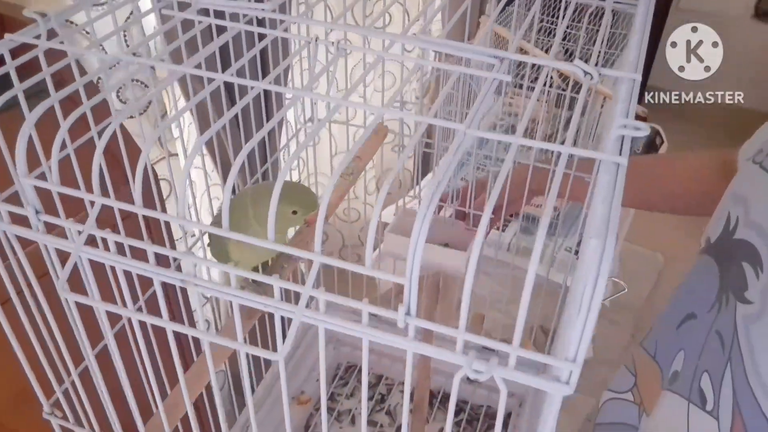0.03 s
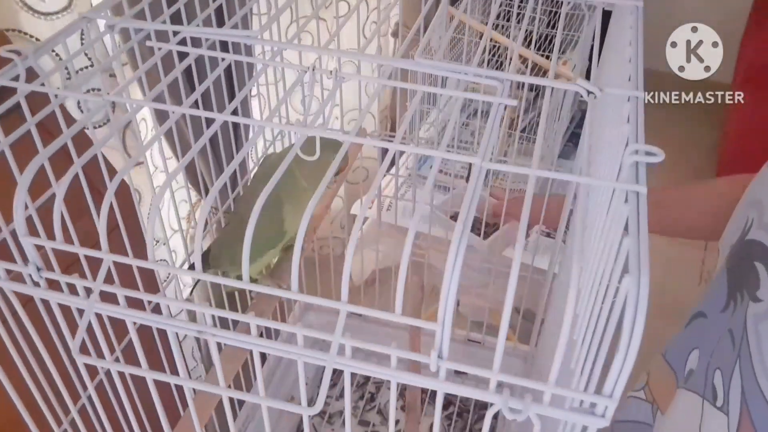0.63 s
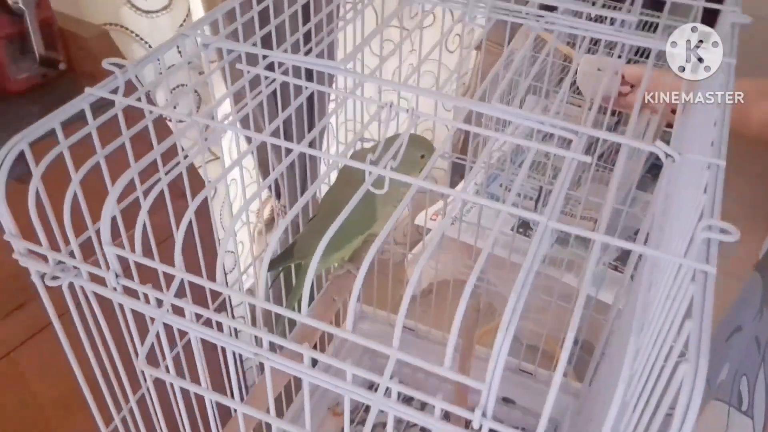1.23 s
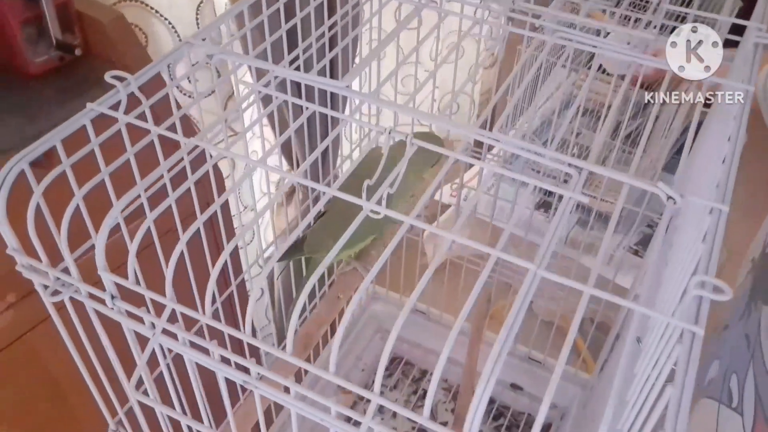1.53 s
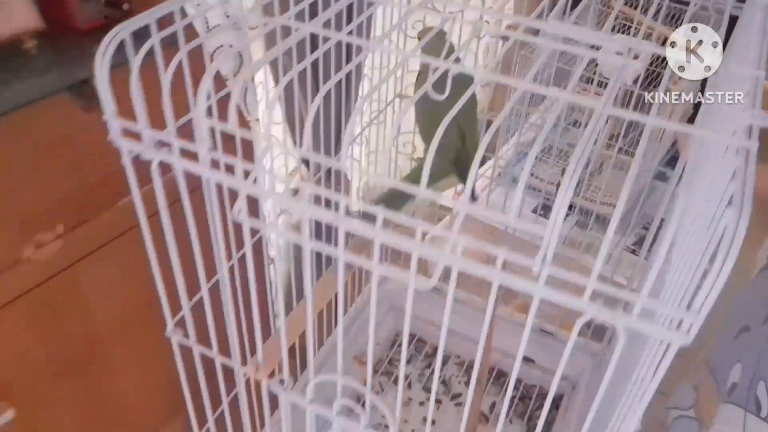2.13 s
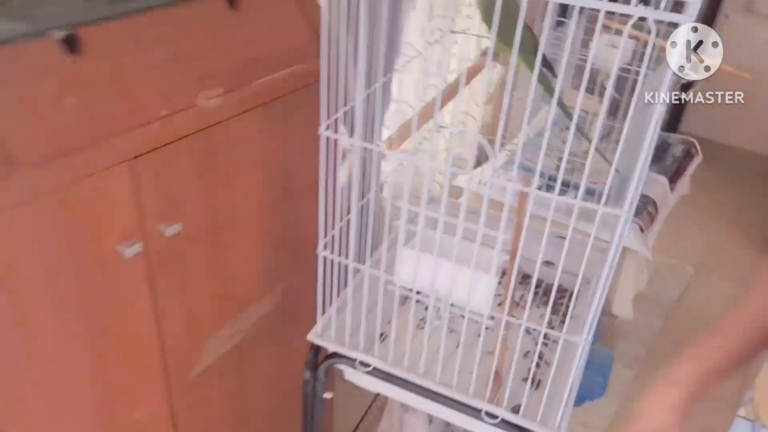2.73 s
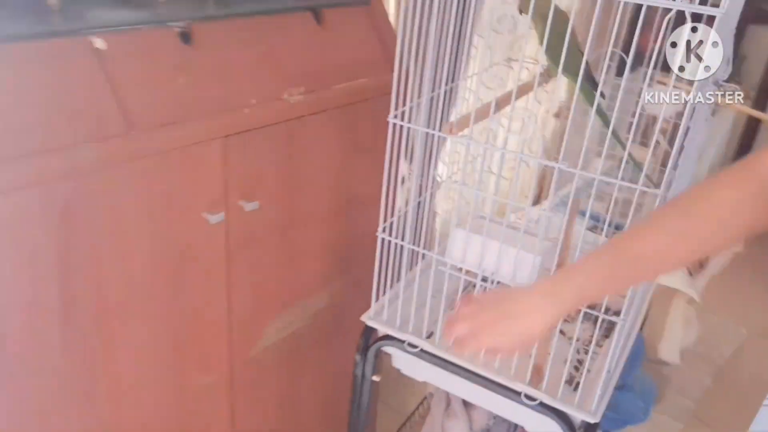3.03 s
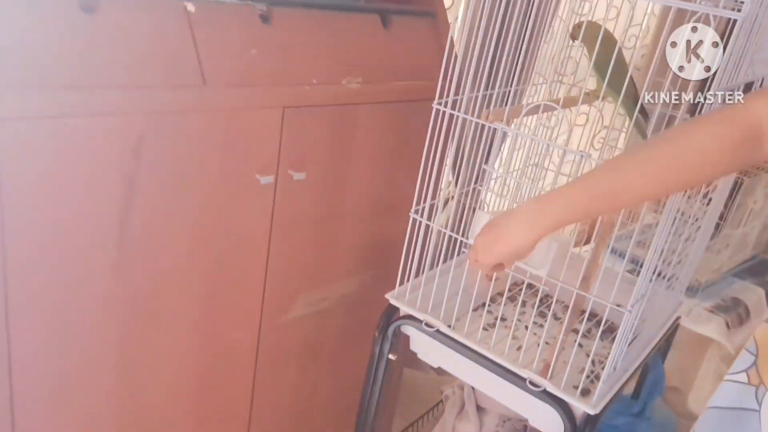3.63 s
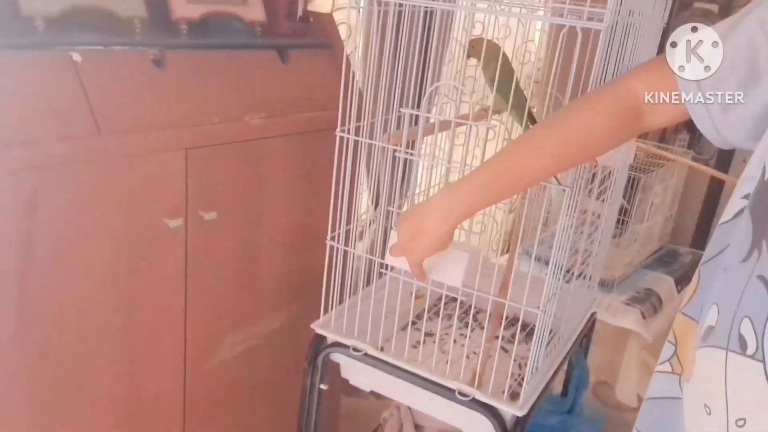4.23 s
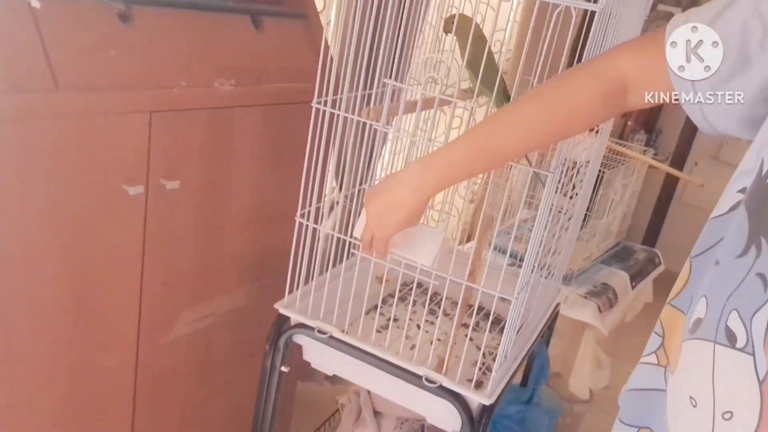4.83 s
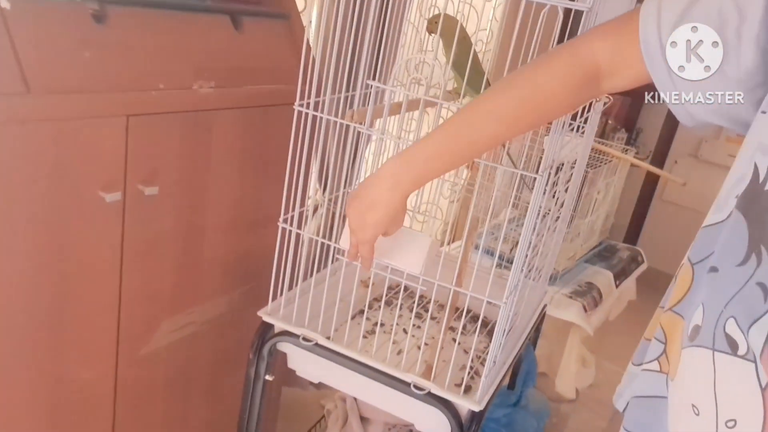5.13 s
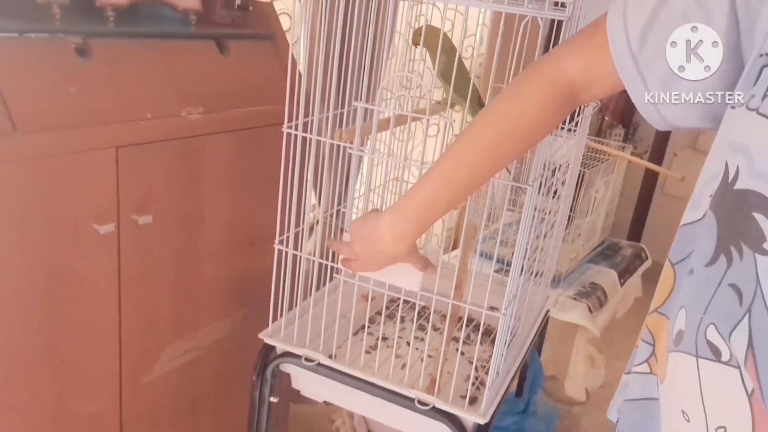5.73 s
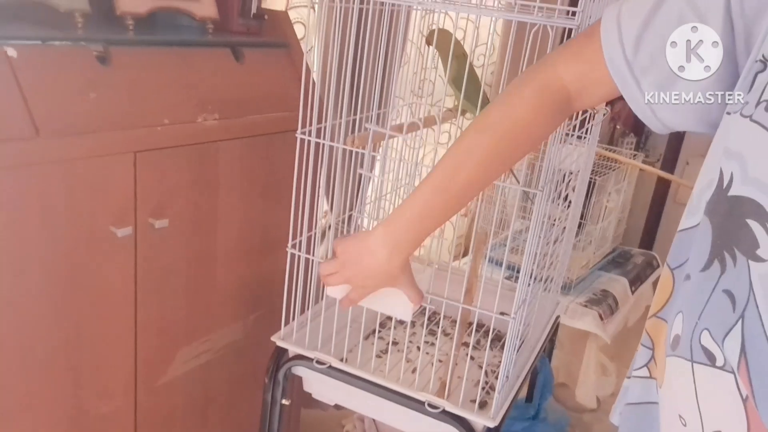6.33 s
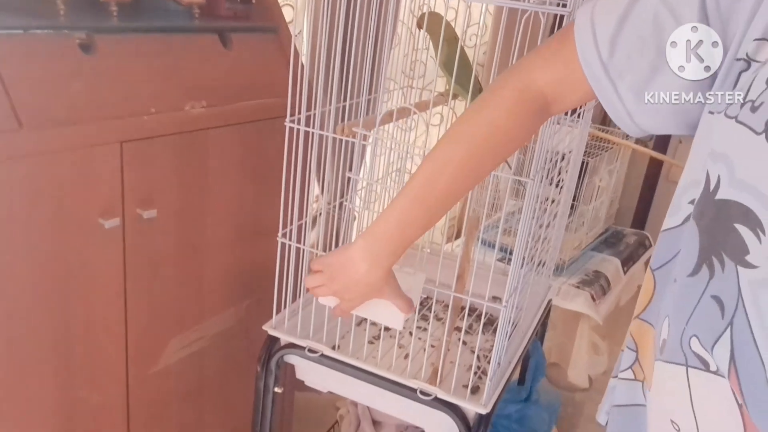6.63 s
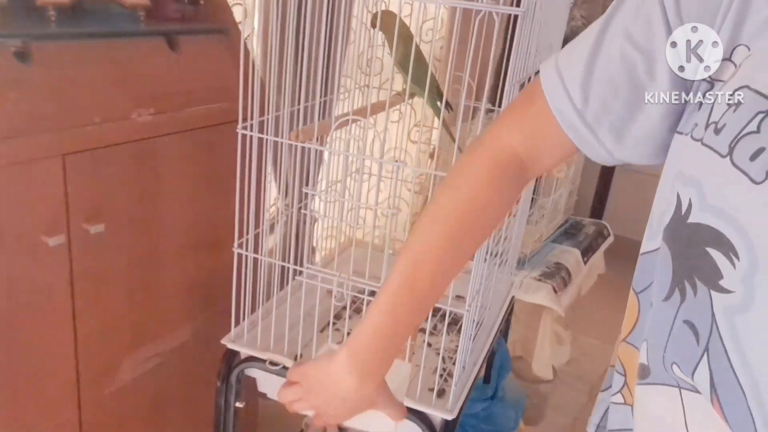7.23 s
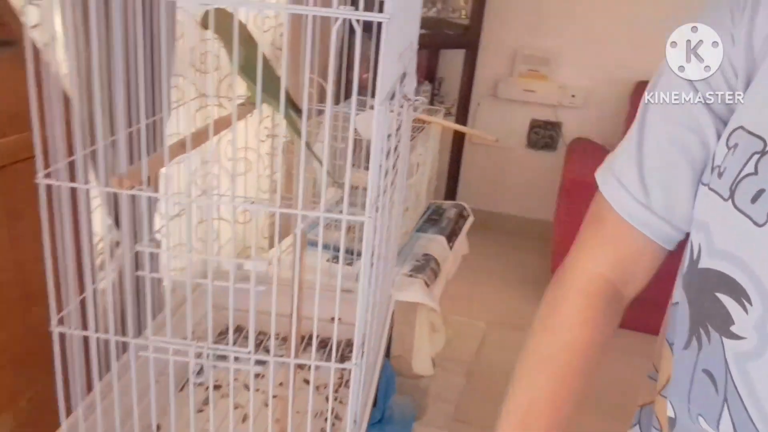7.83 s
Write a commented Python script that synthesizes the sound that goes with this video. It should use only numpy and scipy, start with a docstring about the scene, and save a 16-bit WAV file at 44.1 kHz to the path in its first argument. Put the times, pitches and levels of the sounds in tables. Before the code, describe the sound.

A wire birdcage rattles and clangs in an echoing room as a plastic feeder is worked loose, with one hoarse parakeet squawk.

```python
"""A wire birdcage is handled in a hard, echoing room, over a low rumble. Its side wires rattle and its
frame clangs, each knock a swarm of tiny contacts that sets the metal ringing; a faint tone lingers.
From about 3 s a plastic feeder is worked loose, knocking amid more clangs of the frame. Near 5.7 s a
parakeet gives one hoarse, rising squawk, then the small front door clacks shut. After a few more knocks
a small bird chirps twice with both sides of its syrinx, and the feeder gives a last soft tap."""
import sys
import numpy as np
from scipy import signal
from scipy.fft import rfft, irfft
from scipy.io import wavfile
from scipy.ndimage import uniform_filter1d

SR = 44100
rng = np.random.default_rng(int(sys.argv[2]) if len(sys.argv) > 2 else 0)


def pcm_store(signal):
    """Save signal as 16-bit PCM."""
    levels = np.round(np.clip(np.atleast_2d(signal), -1, 1) * 32767)
    wavfile.write(sys.argv[1], SR, levels.astype(np.int16).T)


N = 356680
SIZE = 49152  # samples in one knock with its tail
T = np.arange(SIZE) / SR
HZ = np.fft.rfftfreq(SIZE, 1 / SR)


def amp(db):
    """Decibels to gain."""
    return 10 ** (np.asarray(db) / 20)


def unit_rms(x):
    """Scaled to rms 1."""
    return x / np.sqrt(np.mean(x ** 2) + 1e-20)


def unit_energy(x):
    """Scaled to energy 1 in each channel."""
    return x / np.sqrt(np.sum(x ** 2, axis=-1, keepdims=True) + 1e-20)


def curve(points, hz):
    """Breakpoints (frequency, value) joined on a log-frequency axis."""
    freqs, values = np.transpose(points)
    return np.interp(np.log(hz + 1), np.log(freqs), values)


def decay(t, t60):
    """Falls 60 dB in t60 seconds."""
    return np.exp(-np.log(1000) * t / np.maximum(t60, 1e-3))


def add(mix, s, sound):
    """Mixes a sound in at s seconds."""
    part = mix[..., max(round(s * SR), 0):][..., :sound.shape[-1]]
    part += sound[..., :part.shape[-1]]


def min_phase(db):
    """Minimum-phase frequency response for a dB curve over HZ."""
    log_gain = np.log(amp(np.r_[db, db[-2:0:-1]]))
    return np.exp(np.conj(signal.hilbert(log_gain)))[:len(db)]


def wobble(count, size):
    """A random line of rms 1, smoothed over size points."""
    return unit_rms(uniform_filter1d(uniform_filter1d(rng.standard_normal(count), size), size))


def trembling_phase(hz, jitter, size=24):
    """Phase of a tone whose pitch trembles at random."""
    return 2 * np.pi * np.cumsum(hz * (1 + jitter * wobble(len(hz), size))) / SR


def mic_pair(spectra, hz):
    """Two unrelated spectra become a microphone pair, alike in the bass."""
    # Stereo image of the room: (frequency [Hz], left-right likeness [0-1])
    likeness = [(100, 1), (380, 0.87), (650, 0.39), (1100, 0.046), (3000, 0.056), (12000, 0.016)]
    same = np.clip(curve(likeness, hz), 0, 1)
    return np.array([same * spectra[1] + np.sqrt(1 - same ** 2) * spectra[0], spectra[1]])


def room(build_s=0.0052, echoes_per_s=5000):
    """Frequency response of the room from one spot: dense echoes, each band dying at its own speed."""
    # Reverb tail: (frequency [Hz], t60 [s])
    reverb_times = [(120, 1.23), (400, 1.16), (1000, 0.93), (2800, 0.58), (7000, 0.53), (15000, 0.36)]
    echoes = rng.standard_normal((2, SIZE)) * (rng.random((2, SIZE)) < echoes_per_s / SR)
    echoes *= 1 - np.exp(-T / build_s)
    hz, t, bands = signal.stft(echoes, SR, nperseg=256)
    t60 = curve(reverb_times, hz)[:, None]
    bands = mic_pair(bands, hz[:, None]) * decay(t, t60) / np.sqrt(t60)
    return rfft(unit_energy(signal.istft(bands, SR, nperseg=256)[1][:, :SIZE]))


def reverb(sound):
    """The room's stereo answer to a sound."""
    return signal.fftconvolve(np.atleast_2d(sound), irfft(room()), axes=1)[:, :N]


def rumble(level_db=-51.5, hiss_from_hz=3100):
    """Room noise with a few low resonances standing out; its hiss lifts, then slowly sinks."""
    # Room tone: (frequency [Hz], relative level [dB])
    tone_colour = [(20, -29), (32, -15), (48, 3.5), (76, -30), (110, -12.5), (200, -7.5), (320, -14),
                   (450, -9), (700, -16), (1200, -19), (2000, -22.5), (3200, -30), (8000, -30.5),
                   (15000, -36)]
    # Level of the treble hiss over time: (time [s], gain [dB])
    hiss_course = [(1.2, -7), (3.2, -3), (5.3, -9), (8, -9)]
    # Low room resonances: (centre [Hz], half-width [Hz], level [dB])
    resonances = [(48.6, 15, -60.5), (101.6, 14, -58), (153, 9.4, -69), (209.8, 2.9, -67)]
    hz = np.fft.rfftfreq(N, 1 / SR)
    noise = mic_pair(rfft(rng.standard_normal((2, N))), hz)
    wash = amp(level_db) * unit_rms(irfft(noise * amp(curve(tone_colour, hz)), N))
    hiss = wash - irfft(rfft(wash) / (1 + (hz / hiss_from_hz) ** 4), N)
    hiss_gain = amp(np.interp(np.arange(N) / SR, *np.transpose(hiss_course)))
    drones = sum(amp(db) * unit_rms(irfft(noise / (1 + ((hz - centre) / width) ** 4), N))
                 for centre, width, db in resonances)
    return wash + (hiss_gain - 1) * hiss + drones


def contacts(snap_db, chatter_s, per_s, spread_db=4):
    """A first snap, snap_db over the swarm of small contacts that follows as loose parts bounce."""
    age = T / max(chatter_s, 1e-3)
    hits = (rng.random(SIZE) < per_s / SR) * rng.choice([-1, 1], SIZE)
    sizes = amp(spread_db * rng.uniform(-1.64, 2.8, SIZE))
    drive = unit_energy(hits * sizes * age * np.exp(-age))
    drive[0] += amp(snap_db)
    return unit_energy(drive)


def contact_colour(thud_db, tilt_db, clean, pivot_hz=980, thud_octaves=1.7):
    """Spectrum of one knock in dB: heavy contacts thud, hard ones are bright, clean snaps crack."""
    # EQ of a clean single snap: (frequency [Hz], gain [dB])
    crack = [(135, -22.5), (380, -3.5), (1100, -7), (2300, 5.5), (4800, -3.5), (11500, -2.5)]
    octaves = np.log2((HZ + 1) / pivot_hz)
    bass_db = thud_db * np.clip(-octaves / thud_octaves, 0, 1)
    treble_db = tilt_db * np.maximum(octaves, 0)
    return bass_db + treble_db + clean * curve(crack, HZ)


def ringing(modes, drift=0.0093):
    """Spectrum of a part's own tones, wavering as the hand's load shifts."""
    bent_time = np.cumsum(1 + drift * wobble(SIZE, size=500)) / SR
    tones = 0
    for hz, db, t60 in modes:
        turns = rng.random() + rng.random((2, 1)) * min(hz / 2000, 1)  # long waves reach both mics in step
        tones += amp(db) * decay(T, t60) * np.sin(2 * np.pi * (hz * bent_time + turns))
    return rfft(tones)


def retuned(spectrum, slack=0.0086):
    """Each knock finds the wires under a slightly different tension."""
    tuning = 1 + slack * rng.standard_normal()
    return np.array([np.interp(HZ / tuning, HZ, channel) for channel in spectrum])


def knocks(hits, modes, part_eq, per_s, tick_db, clack_db, clack_t60, ring_db, room_db,
           ripple_db, near_db):
    """Contacts excite one part of the cage: a tick, a short clack of crowded modes, a ring, the room."""
    # EQ of the whole cage: (frequency [Hz], gain [dB])
    cage_eq = [(40, -8), (85, -7.5), (125, 3), (175, -5), (300, 2), (680, -6), (1200, -2.5), (1750, -3),
               (2300, 0), (5500, -1), (7500, -1.5), (10000, -3.5), (14000, -1)]
    body_db = curve(cage_eq, HZ) + curve(part_eq, HZ)
    spots = []
    for _ in range(3):
        # each place of contact favours some high resonances and misses others
        peaks_db = ripple_db * np.minimum(wobble(len(HZ), size=130), 1) * HZ / (HZ + 1800)
        burst = unit_energy(rng.standard_normal((2, SIZE)) * decay(T, clack_t60))
        clack = mic_pair(rfft(burst), HZ)
        direct = (amp(tick_db) + amp(clack_db) * clack) * min_phase(peaks_db)
        echoes = amp(room_db) * room() * min_phase(0.31 * peaks_db)  # the room evens out the peaks
        spots.append((direct, amp(ring_db) * ringing(modes), echoes))
    out = np.zeros((2, N))
    for k, (s, strength_db, thud_db, tilt_db, chatter_s, snap_db, hit_ring_db) in enumerate(hits):
        direct, ring, echoes = spots[k % len(spots)]
        clean = np.clip(snap_db / 11, 0, 1)  # 11 dB over the chatter is a clean single snap
        blow_db = strength_db + body_db + contact_colour(thud_db, tilt_db, clean)
        blow = rfft(contacts(snap_db, chatter_s, per_s)) * min_phase(blow_db)
        near = amp(near_db * clean)  # below 1, a clean snap trades direct sound for room
        held_ring = amp(hit_ring_db) * retuned(ring)  # low where the hand damps it
        add(out, s, irfft(blow * (direct * near + held_ring + echoes / np.sqrt(near))))
    return out


def side_rattle():
    """The loose side wires bounce against each other and ring."""
    # Rattles: (time [s], strength [dB], thud [dB], tilt [dB/octave], chatter [s], snap [dB], ring [dB])
    hits = [(0.003, 4, -2, -5, 0.019, 0, -23), (0.317, 14.5, -9, -7, 0.0038, -8, 1),
            (0.3985, 18.5, -3.5, -5, 0.0038, 8, -9), (0.416, 20.5, -1.5, -4, 0.012, 2, -13),
            (0.4715, 11.5, 11, -1.5, 0.00062, 10.5, -7), (0.488, 13, 2, -4, 0.0045, -28, -3.5),
            (0.526, 17, -16, -5, 0.0024, 1, -10), (0.537, 12, -5, -3, 0.0067, -2, -15),
            (0.58, 11, 9.5, -4, 0.027, -5, -5), (0.7125, 10, 2.5, -2, 0.0053, 3, -10),
            (0.732, 10.5, 3, -9, 0.0096, -5.5, -12), (1.364, 1.5, 0, -3.5, 0.035, -13, -6.5),
            (2.04, -7.5, -18, -2.5, 0.059, -11.5, -25), (2.13, -6, 5, -3, 0.03, -7, -29),
            (2.729, -5.5, -3, -6, 0.027, 2, -21)]
    # Tones of the side wires: (frequency [Hz], level [dB], t60 [s])
    modes = [(296, -47.5, 0.57), (325.4, -57, 0.52), (412.5, -55, 2.07), (463, -59.5, 0.84),
             (1010, -38.5, 0.27), (2060, -62, 0.22), (2286, -45, 0.16), (3120, -68, 0.12),
             (3340, -35.5, 0.099), (4280, -50, 0.04), (7650, -27, 0.1)]
    # How the side takes a knock: (frequency [Hz], gain [dB])
    eq = [(135, -6.5), (380, -1.5), (1000, 2), (1500, 0), (2200, 0), (2750, -2.5), (3400, -3.5), (4800, -1),
          (11500, 4)]
    return knocks(hits, modes, eq, per_s=1100, tick_db=-21.5, clack_db=-2.5, clack_t60=0.038,
                  ring_db=3.5, room_db=-1.0, ripple_db=8.5, near_db=0.0)


def frame_clangs():
    """The knocked metal frame clangs, its crowded modes dying slowly."""
    # Clangs: (time [s], strength [dB], thud [dB], tilt [dB/octave], chatter [s], snap [dB], ring [dB])
    hits = [(0.0875, 29.5, -2.5, -7, 0.0036, 2.5, -3.5), (0.2895, 18.5, 11, -5.5, 0.0017, 23, -6.5),
            (1.618, 12, 2.5, -3, 0.052, 0.5, -11.5), (1.775, 7, 0.5, -3.5, 0.012, -1, -11),
            (1.88, 4.5, -24, -4, 0.017, 1.5, -22), (3.84, 21.5, -11, -8.5, 0.11, -39, -11.5),
            (3.934, 23.5, -2, -5, 0.013, -6, -12), (4.10, 8, 1, -3.5, 0.0084, 4.5, -12),
            (4.215, 1.5, 10.5, -6, 0.012, 10, -21), (4.34, 9, 3.5, -9.5, 0.11, -31, -11.5),
            (4.606, 15.5, -3, -10.5, 0.012, -11, -15), (4.857, 12, 0.5, -5, 0.0086, -12, -11),
            (4.93, 13, 2.5, -9.5, 0.0063, 6, -16), (5.095, 4.5, 1, -6.5, 0.014, 3.5, -23),
            (6.273, 27.5, -5.5, -6, 0.02, -6.5, -8), (6.84, 14.5, 5, -4, 0.034, -5.5, -5)]
    # Tones of the frame: (frequency [Hz], level [dB], t60 [s])
    modes = [(285, -68, 0.26), (992, -53, 0.51), (1053, -42, 0.21), (1148, -45, 0.4), (1290.4, -40.5, 0.3),
             (1507, -42, 0.092), (1780, -51, 0.084), (1960, -31.5, 0.02), (2238, -30, 0.041),
             (3120, -40, 0.22), (4840, -35.5, 0.044)]
    # How the frame takes a knock: (frequency [Hz], gain [dB])
    eq = [(135, -1), (250, 1), (380, 1), (800, 1.5), (1200, 2), (2300, -0.5), (2800, -3.5), (4800, -1.5),
          (11500, 4)]
    return knocks(hits, modes, eq, per_s=1200, tick_db=-25.5, clack_db=-7.5, clack_t60=0.14,
                  ring_db=2.0, room_db=-4.0, ripple_db=1, near_db=-2.5)


def wire_tone(hz, db, t60, count=4, detune=0.017):
    """One bending tone, shared by a few nearly alike wires that start together and drift apart."""
    t = T[:SR // 2]
    offsets = np.linspace(-1, 1, count) + rng.uniform(-0.36, 0.88, count)
    pitches = hz * (1 + detune * offsets[:, None, None])
    tones = np.sin(2 * np.pi * (pitches * t + rng.random((2, 1)))).sum(0)
    fade = decay(t, t60)
    return amp(db) * unit_energy(tones * fade) * np.sqrt(np.sum(fade ** 2) / 2)


def wire_clanks(room_db=-7):
    """Wires struck hard ring out over the rattle with two bending tones, and the room answers."""
    # Struck wires: (time [s], first tone [Hz], level [dB], second tone [Hz], level [dB], t60 [s])
    strikes = [(0.0875, 1900, -21, 2257, -17, 0.18), (0.29, 308, -33, 525, -30, 0.23),
               (0.323, 1080, -25, 3720, -27, 0.077), (0.399, 2110, -21.5, 3710, -20, 0.15),
               (0.403, 2280, -21.5, 4420, -26, 0.13), (0.408, 900, -24.5, 1000, -33, 0.14),
               (0.4715, 2265, -26, 3185, -21, .1), (0.478, 1005, -25, 1265, -34, 0.3),
               (0.488, 3280, -22.5, 3795, -31, 0.11), (0.537, 1840, -25, 3280, -29, 0.1),
               (0.575, 1110, -26.5, 1924, -28, 0.34), (0.635, 286, -40, 1075, -31, 0.51),
               (0.713, 463, -28.5, 825, -31.5, 0.23), (0.718, 553, -31, 288, -33, 0.25),
               (1.62, 250, -57, 984, -45, 0.6), (1.69, 132, -37, 288, -48, 0.32),
               (1.784, 126, -36, 262, -49, 0.47), (3.938, 1000, -42, 1603, -30.5, 0.22),
               (3.944, 2210, -39, 4530, -36, 0.35), (4.612, 603, -36.5, 945, -34.5, 0.55),
               (4.62, 267, -35.5, 469, -41, 0.5), (6.084, 1140, -41, 1990, -35, 0.056),
               (6.282, 1004, -35, 1285, -21.5, 0.34), (6.4465, 1630, -22.5, 3860, -26, 0.15),
               (6.468, 2940, -28, 3290, -26, 0.15), (6.488, 2440, -21.5, 3800, -33, 0.14),
               (6.641, 2420, -33, 5280, -41, 0.2), (6.8, 1030, -43, 1760, -36.5, 0.18),
               (6.87, 211, -46, 964, -35, 0.45), (6.89, 437, -35, 2520, -34, 0.39)]
    wires = np.zeros((2, N))
    for s, first_hz, first_db, second_hz, second_db, t60 in strikes:
        add(wires, s, wire_tone(first_hz, first_db, t60) + wire_tone(second_hz, second_db, t60))
    return wires + amp(room_db) * reverb(wires)


def hums():
    """A faint, unsteady low tone swells and fades twice after the first rattle."""
    # Lingering tones: (time [s], length [s], pitch [Hz], level [dB])
    swells = [(0.921, 0.23, 395, -59), (1.129, 0.31, 455.4, -54)]
    out = np.zeros(N)
    for s, length_s, hz, db in swells:
        swell = np.hanning(round(length_s * SR))
        phase = trembling_phase(np.full(len(swell), hz), jitter=0.022, size=400)
        add(out, s, amp(db) * swell * unit_rms(np.sin(phase)))
    return out


def feeder_knocks():
    """The plastic feeder is worked loose: dense contacts, each with a very short clack."""
    # Knocks: (time [s], strength [dB], thud [dB], tilt [dB/octave], chatter [s], snap [dB], ring [dB])
    hits = [(3.265, -2, 3, -4.5, 0.0054, -6, -18), (3.378, 2, 4, -4.5, 0.0028, 0, -15),
            (3.497, 0.5, 4.5, -6.5, 0.0096, 1.5, -16), (3.53, 0.5, 7, -10.5, 0.0065, -4, -9),
            (5.567, -7, 8, -4, 0.012, -4, -11), (5.648, 6, 5.5, -8.5, 0.053, -6, -26),
            (6.084, 9.5, -7, -13, 0.0026, 7.5, -18), (6.258, 17.5, -6, -9.5, 0.017, -15, -18),
            (6.8, 8.5, -12, -8.5, 0.014, -7, -14), (7.074, 13, -4.5, -2.5, 0.007, -6, -6.5),
            (7.213, 7, -2.5, -4, 0.0094, -4, -5), (8.042, -12, -10, -4, 0.012, -21, -16)]
    # Tones of the feeder: (frequency [Hz], level [dB], t60 [s])
    modes = [(790, -56, 0.22), (1346, -46.5, 0.45), (2547, -39, 0.12), (3160, -37, 0.35), (4200, -41, 0.2),
             (4877, -45, 0.25), (7100, -30, 0.12)]
    # How the plastic takes a knock: (frequency [Hz], gain [dB])
    eq = [(135, -2.5), (380, -4), (1100, 2.5), (2300, 0), (4800, 1), (7500, 3.5), (11500, 5)]
    return knocks(hits, modes, eq, per_s=2200, tick_db=-12, clack_db=-5.0, clack_t60=0.012,
                  ring_db=4.5, room_db=0.5, ripple_db=3.5, near_db=-0.5)


def squawk(flutter_depth=0.75, smear_rad=1.6, rasp_depth=0.5, uneven_depth=0.34):
    """A parakeet forces its voice: five harmonics rise in pitch and grow rough."""
    # Squawk: (time [s], pitch [Hz], level [dB], roughness [0-1], tilt before roll-off [dB/harmonic])
    gesture = [(5.694, 1707, -56, 0.2, -2), (5.722, 1870, -38.5, 0.45, 5), (5.766, 2066, -35.5, 0.55, 3.5),
               (5.81, 2374, -36.5, 0.68, -6), (5.845, 2480, -38, 0.72, -6), (5.879, 2450, -42.5, 0.7, -7),
               (5.9, 2380, -57, 0.7, -13.5)]
    times, *columns = np.transpose(gesture)
    t = np.arange(times[0], times[-1], 1 / SR)
    hz, level_db, rough, tilt_db = [np.interp(t, times, column) for column in columns]
    phase = trembling_phase(hz, jitter=0.045 * rough)
    overtone = np.arange(5)[:, None]
    gains = amp(tilt_db * overtone - 1.84 * overtone * (overtone + 2.5))
    # each harmonic flutters on its own, widened by random phase
    flutter = 1 + flutter_depth * rough * np.array([wobble(len(t), size=44) for _ in overtone])
    smear = smear_rad * rough * np.array([wobble(len(t), size=80) for _ in overtone])
    harmonics = gains * unit_rms(flutter) * np.sin((overtone + 1) * phase + smear)
    voice = harmonics.sum(0) / np.sqrt((gains ** 2).sum(0) / 2)
    rasp = unit_rms(1 + rasp_depth * rough * wobble(len(t), size=20))
    # strong and weak cycles, in threes, put side tones between the harmonics
    uneven = unit_rms(1 + uneven_depth * rough * np.cos(phase / 3))
    out = np.zeros(N)
    add(out, times[0], amp(level_db) * rasp * uneven * voice)
    return out


def chirps(top_at=0.72, sag=0.16, held_hz=4320, jitter=0.009):
    """One side of a small bird's syrinx glides up and swells; the other joins at the top on one pitch."""
    # Two thin chirps: (time [s], length [s], top of the glide [Hz], level [dB])
    calls = [(7.563, 0.037, 3880, -56.5), (7.724, 0.046, 3820, -53)]
    out = np.zeros(N)
    for s, length_s, top_hz, level_db in calls:
        progress = np.arange(0, length_s, 1 / SR) / length_s
        off_top = (progress / top_at - 1) ** 2
        glide = amp(-8 * off_top) * np.sin(trembling_phase(top_hz * (1 - sag * off_top), jitter))
        held = amp(3 - 67 * off_top) * np.sin(trembling_phase(np.full(len(glide), held_hz), jitter))
        add(out, s, amp(level_db) * signal.windows.tukey(len(glide), 0.3) * (glide + held))
    return out


def door_clacks():
    """The small wire door clacks shut in a quick run of bright, ringing hits."""
    # Clacks: (time [s], strength [dB], thud [dB], tilt [dB/octave], chatter [s], snap [dB], ring [dB])
    hits = [(6.434, 6.5, 0.5, -4, 0.0019, -3, -25), (6.4465, 14, -6, -1, 0.004, 8.5, -5),
            (6.467, 11.5, 3.5, -3, 0.0044, -4, -1), (6.488, -1, -10, -7, 0.0026, 12, 12),
            (6.641, 5.5, -3, -4.5, 0.0024, 12, 0.5)]
    # Tones of the door: (frequency [Hz], level [dB], t60 [s])
    modes = [(1088, -50, 0.56), (1380, -59, 0.29), (2170, -42, 0.103), (2440, -49, 0.38), (2540, -40, 0.16),
             (2430, -40, 0.1), (3230, -40.5, 0.19), (2910, -42, 0.042), (3170, -48, 0.2),
             (3930, -38, 0.062), (5530, -38, .12), (8100, -45, 0.22), (10600, -41, .2)]
    # How the door takes a knock: (frequency [Hz], gain [dB])
    eq = [(135, -9), (380, -4.5), (1100, 0.2), (2300, -1), (4800, 1.5), (11500, 2.5)]
    return knocks(hits, modes, eq, per_s=1100, tick_db=-12.5, clack_db=-3.5, clack_t60=0.033,
                  ring_db=6.0, room_db=-1.0, ripple_db=5.5, near_db=-1.0)


def scene():
    """The handled cage, the faint hums and the two birds with their echo, over the room's rumble."""
    cage = frame_clangs() + side_rattle() + door_clacks() + feeder_knocks() + wire_clanks()
    lingering = hums()
    birds = squawk() + chirps()
    return cage + lingering + amp(-2) * (birds + reverb(birds)) + rumble()


def record(dry, cutoff_hz=15650):
    """The right microphone faces the cage and hears more of it; a low-pass trims the very top."""
    # Stereo balance: (frequency [Hz], left minus right [dB])
    balance = [(100, -2.5), (280, -1.5), (550, -4.5), (2000, -5.5), (4000, -8), (8000, -3.5), (14000, 0)]
    balance_db = curve(balance, np.fft.rfftfreq(N, 1 / SR))
    heard = irfft(rfft(dry) * amp([balance_db / 2, -balance_db / 2]), N)
    lowpass = signal.firwin(511, cutoff_hz, window=("kaiser", 9), fs=SR)
    return signal.oaconvolve(heard, lowpass[None], "same")


dry = scene()
out = record(dry)
pcm_store(out)
```